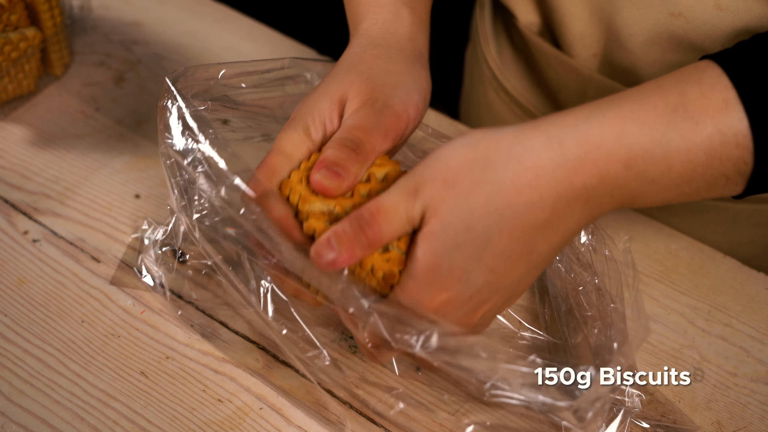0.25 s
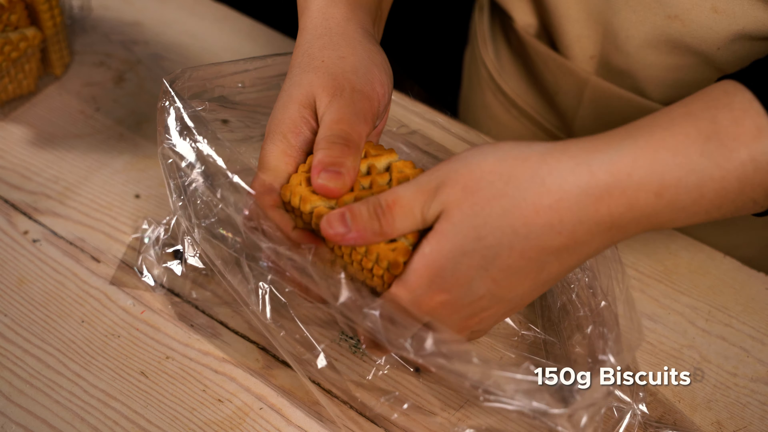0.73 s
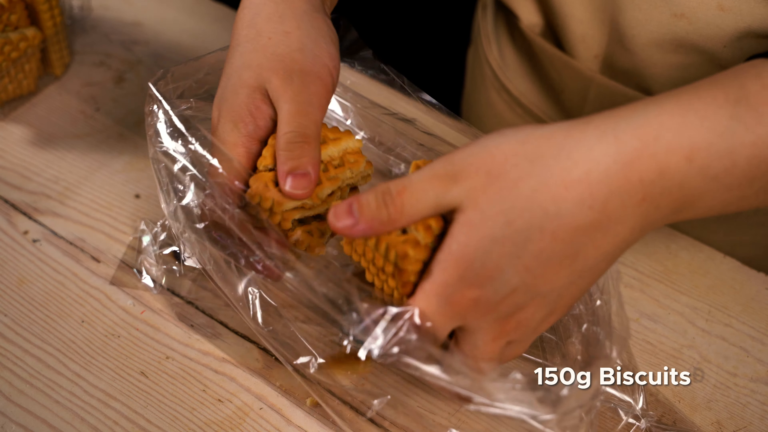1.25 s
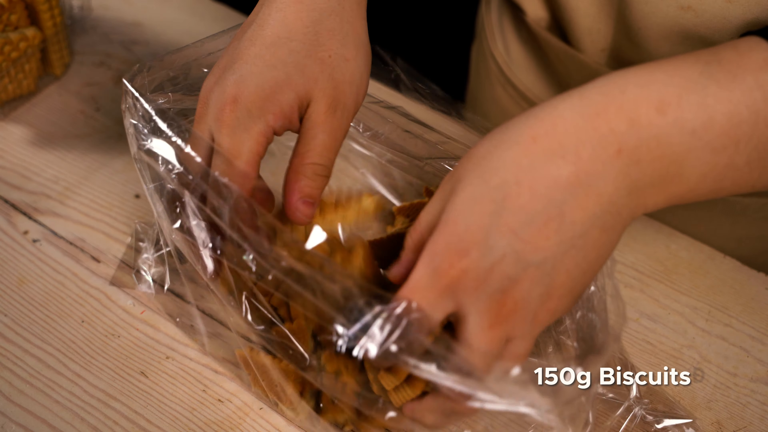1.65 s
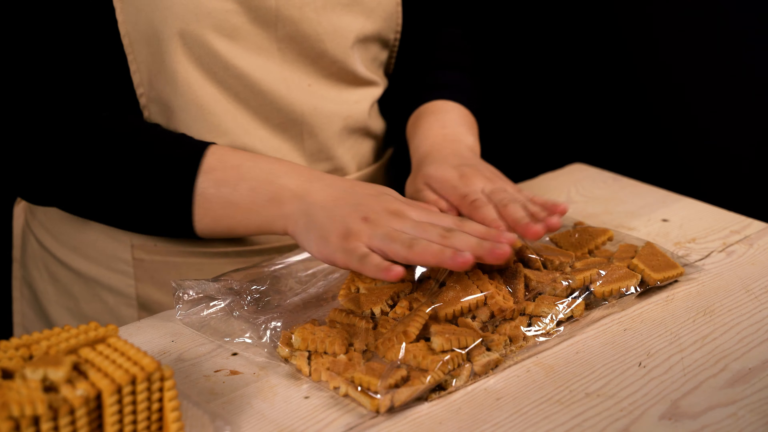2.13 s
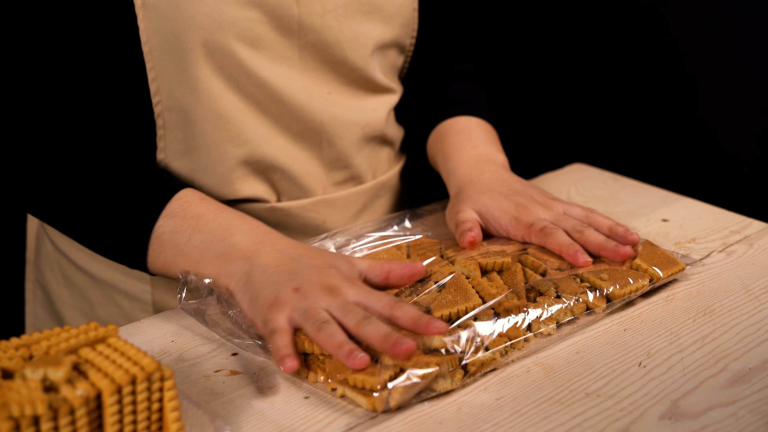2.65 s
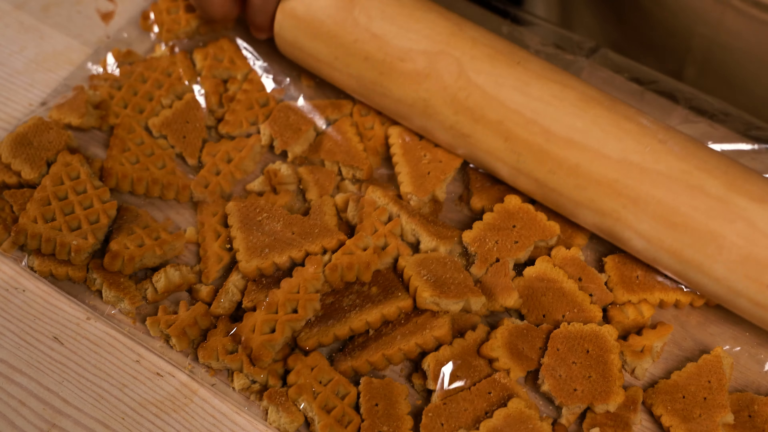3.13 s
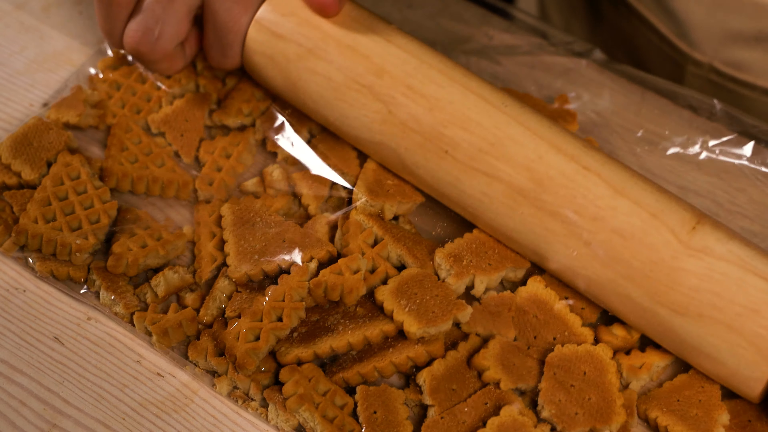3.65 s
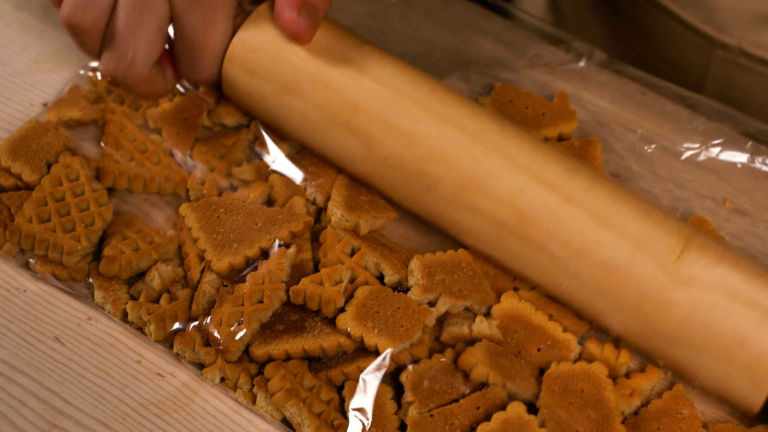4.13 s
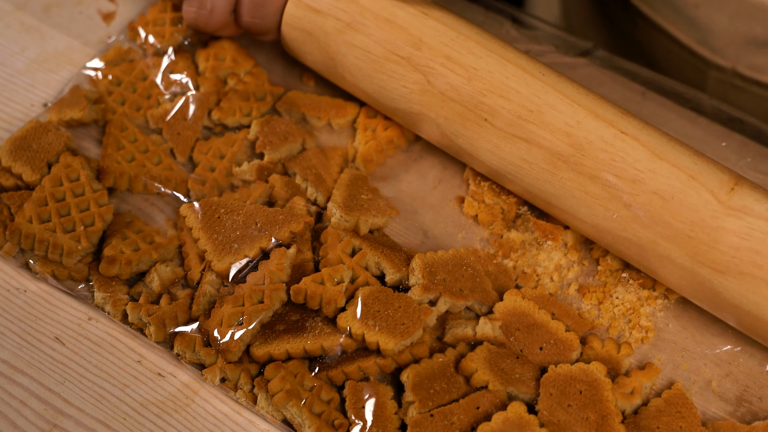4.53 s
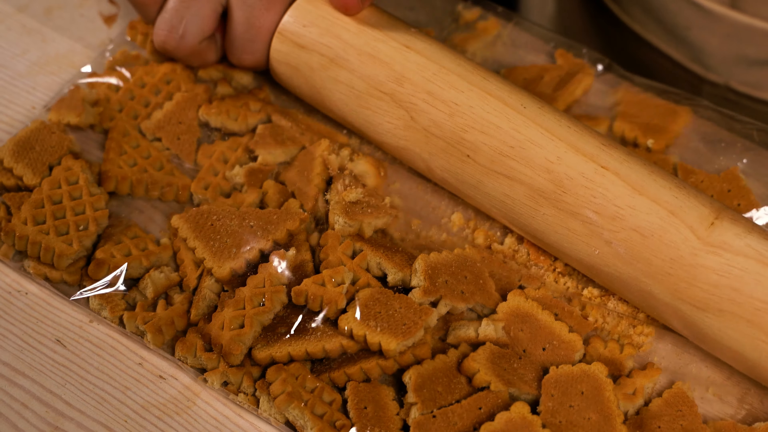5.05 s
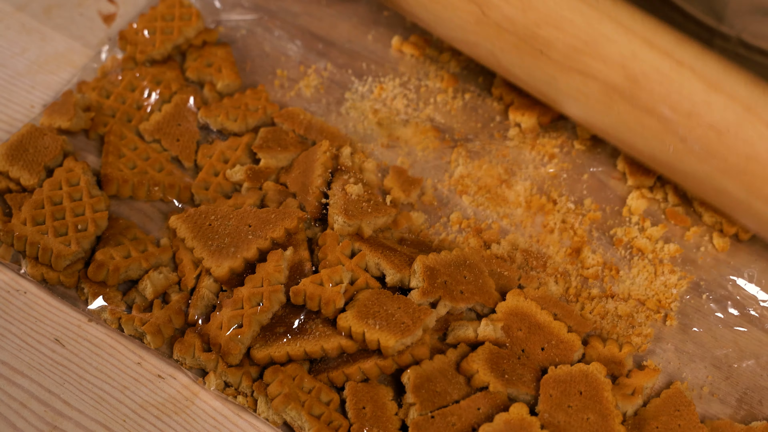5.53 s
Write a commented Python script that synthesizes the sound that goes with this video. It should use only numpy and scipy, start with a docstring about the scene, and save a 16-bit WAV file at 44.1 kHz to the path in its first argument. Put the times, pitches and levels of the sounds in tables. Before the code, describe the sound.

A close stereo microphone in a small, short-sounding kitchen, over a faint deep rumble and a dull low hum near the start. From 0 to 1.2 s fingers squeeze dry biscuits in thin plastic: fine bright crackle, crinkles and scattered sharp snaps, strongest around 0.4 s. At 1.3 and 1.5 s biscuits break with crisp crunches, and pieces tumble onto the wooden table in hollow knocks, densest at 1.6 to 1.75 s, thinning by 2.1 s. From 2.3 to 3.1 s palms spread them in three or four muffled, grating sweeps with small cracks. Then a rolling pin creeps quietly until a crunch at 3.65 s and a loud crunching thud at 3.9 s. Smaller knocks and crunches come at 4.5, 4.8 and 4.95 s, a heavy, long crunch at 5.07 s, crumbly crackling around 5.3 s, and a hard, bright wooden clack at 5.67 s, slightly overloaded.

```python
"""Crushing biscuits on a table

Dry biscuits are snapped by hand inside a plastic bag and tumble onto a wooden table; palms spread the pieces,
then a rolling pin bears down and breaks through them, knocking on the table top. Fracture is synthesized
as showers of tiny damped ticks and bursts of filtered noise, the table, pin and pieces as decaying modes.
A small kitchen answers, and a close stereo microphone overloads softly on the loudest crunches."""
import sys
import numpy as np
from scipy import signal
from scipy.fft import rfft, irfft, next_fast_len
from scipy.io import wavfile
from scipy.ndimage import uniform_filter1d

SR = 44100
rng = np.random.default_rng(int(sys.argv[2]) if len(sys.argv) > 2 else 0)


def digitize_waveform(pressure):
    """Quantize a signal to 16-bit integers and store it at the path in sys.argv[1].

    Rows of a 2-D input are taken as channels; values are limited to [-1, 1].
    """
    field = np.atleast_2d(pressure).T
    bounded = np.clip(field, -1, 1)
    quanta = np.round(bounded * 32767).astype(np.int16)
    wavfile.write(sys.argv[1], SR, quanta)


N = 255339  # samples


def amp(db):
    """Level to amplitude: 20 dB is a factor of ten."""
    return 10 ** (np.asarray(db) / 20)


def unit(x):
    """Normalization to an rms of 1."""
    return x / np.sqrt(np.mean(x ** 2) + 1e-20)


def along(points, hz):
    """Interpolation of (f/Hz, value) points on a logarithmic frequency axis."""
    f, value = np.transpose(points)
    return np.interp(np.log(hz + 1), np.log(f), value)


def add(track, s, sound):
    """Superposition: a sound is summed into a stereo track at time s."""
    part = track[:, max(round(s * SR), 0):][:, :sound.shape[-1]]
    part += sound[..., :part.shape[1]]


def coloured(x, spectrum, size=16384):
    """Minimum-phase filtering by a folded cepstrum: being causal, it keeps attacks sharp."""
    gain_db = along(spectrum, np.fft.rfftfreq(size, 1 / SR))
    cepstrum = irfft(np.log(amp(gain_db)))
    fold = 1 + np.sign(size // 2 - np.arange(size))
    fold[0] = 1
    impulse_response = irfft(np.exp(rfft(cepstrum * fold)))
    return signal.fftconvolve(x, impulse_response[None], axes=1)[:, :x.shape[1]]


def resonant(x, peaks):
    """Parallel second-order resonances with alternating sign, given as (f/Hz, width/Hz, level/dB)."""
    m = next_fast_len(N + SR // 2)
    f = np.fft.rfftfreq(m, 1 / SR)
    body = 0
    for k, (hz, width, db) in enumerate(peaks):
        damping = 1j * f * width
        body = body + (-1) ** k * amp(db) * damping / (hz * hz - f * f + damping)
    return irfft(rfft(x, m) * body, m)[:, :N]


def stereo_noise(length, side_db):
    """Mid-side white noise: side_db sets how far the two channels differ."""
    mid, side = rng.standard_normal((2, length))
    return unit(np.array([mid + amp(side_db) * side, mid - amp(side_db) * side]))


def grains(rate, top_hz, life, size_db, width, clump, count=4):
    """Clustered fracture at rms 1: damped ticks of random pitch, size and place.

    rate is in ticks per second, life (decay constant) and clump (mean delay) in s, count in ticks per cluster."""
    chains = int(rate * N / SR / count)

    def per_tick(values):
        return np.repeat(values, count)

    start = per_tick(rng.uniform(0, N, chains)) + SR * rng.exponential(clump, chains * count)
    cluster_db = size_db * np.minimum(per_tick(rng.exponential(1, chains)), 4)
    strength = amp(cluster_db) * rng.standard_normal(len(start))
    pitch, phase = rng.uniform(0, 1, (2, len(start), 1))
    pan = width * rng.standard_normal((len(start), 1))
    n = np.arange(int(5 * life * SR))
    decay = strength[:, None] * np.exp(-n / (life * SR))
    turn = 2 * np.pi * (top_hz * pitch * n / SR + phase)
    where = (start.astype(int)[:, None] + n).ravel()
    # an off-centre tick is shifted in phase between the capsules, more so the higher it is
    shift = pan * np.sqrt(pitch)
    pair = np.array([np.bincount(where, (decay * np.sin(turn + ear * shift)).ravel(), N)[:N]
                     for ear in (1, -1)])
    # steady pressure releases about the same energy in every short stretch
    power = np.abs(uniform_filter1d(np.mean(pair ** 2, 0), size=1500))
    return unit(pair / np.sqrt(power + 1e-6))


def struck(modes, corner_hz, width):
    """Modal synthesis of one blow on (f/Hz, level/dB, t60/s) modes; a soft contact weakens the high ones."""
    hz, db, t60 = np.transpose(modes)[:, :, None]
    t = np.arange(SR // 2) / SR
    varied_db = db + rng.normal(0, 2.1, hz.shape)
    strength = amp(varied_db) / np.hypot(1, hz / corner_hz)
    sign = (-1) ** np.arange(len(hz))[:, None]
    lead = width * rng.standard_normal(hz.shape)  # phase lead between the capsules
    envelope = sign * strength * amp(-60 * t / t60) * (1 - np.exp(-t * hz * 2))
    pair = np.array([np.sum(envelope * np.sin(2 * np.pi * hz * t + ear * lead), 0) for ear in (1, -1)])
    return pair / (2 * np.linalg.norm(strength))


def effort(pushes, extra_db=0):
    """Energy addition: gain of pushes that swell, hold and die away, linear in dB, their powers summed."""
    s, hold, db, rise, fall = np.transpose(pushes)[:5, :, None]
    t = np.arange(0, N, 16) / SR
    below = np.maximum(s - t, 0) / rise + np.maximum(t - s - hold, 0) / fall  # in steps of 20 dB
    each = amp(db + np.reshape(extra_db, (-1, 1)) - 20 * below)
    return np.interp(np.arange(N) / SR, t, np.linalg.norm(each, axis=0))


# spectrum of the low background: f/Hz, relative density level/dB
RUMBLE_SPECTRUM = [(5, -13.5), (12, -4.5), (25, -9.5), (45, -21.5), (100, -25), (300, -32.5), (2000, -50),
                   (15000, -58)]


def rumble():
    """Stationary random noise, shaped towards the lowest frequencies."""
    return amp(-35.5) * unit(coloured(stereo_noise(N, side_db=-1.0), RUMBLE_SPECTRUM))


# reverberation of the small kitchen: f/Hz, t60/s
KITCHEN_DECAY = [(100, 0.45), (1000, 0.29), (5000, 0.16), (15000, 0.11)]


def kitchen(x):
    """Diffuse reverberation from worktop and walls: convolution with noise whose decay depends on frequency."""
    hz, t, z = signal.stft(stereo_noise(SR // 3, side_db=-18.5), SR, nperseg=256)
    decay = amp(-60 * t / along(KITCHEN_DECAY, hz)[:, None])
    tail = signal.istft(z * decay, SR, nperseg=256)[1]
    return signal.fftconvolve(x, tail / np.linalg.norm(tail[0]), axes=1)[:, :N]


# dull, deep hums: t/s, f/Hz, level shared by both channels/dB, level opposed between them/dB,
# rise constant/s, t60/s
HUM_EVENTS = [(0.14, 66, -25, -7, .06, 1.16), (0.17, 130.6, -10.5, -14, .023, 0.24),
              (0.2, 92.4, -15, -16, .02, 0.46), (0.17, 213, -19.5, -11, 0.042, 0.54),
              (3.9, 86.6, -20, -17, 0.045, 1.04), (5.09, 56, -8, -3, .05, 0.7)]


def hums():
    """Damped free vibration in quadrature: slow hums swell and fade, reaching the capsules out of step."""
    out, t = np.zeros((2, N)), np.arange(SR) / SR
    for s, hz, mid_db, side_db, rise, t60 in HUM_EVENTS:
        turn = 2 * np.pi * hz * t
        opposed = np.outer((1, -1), amp(side_db) * np.cos(turn))
        pair = amp(mid_db) * np.sin(turn) + opposed
        add(out, s, amp(-60 * t / t60) * (1 - np.exp(-t / rise)) * pair)
    return out


# showers of broken pieces landing on the table: t/s, hold/s, relative level/dB,
# rise by 20 dB/s, fall by 20 dB/s
PIECE_SHOWERS = [(1.318, 0.012, -19.5, 0.011, 0.032), (1.52, .04, -40, .03, .1),
                 (1.602, .012, -6.5, 0.029, 0.15), (1.71, 0.086, -15, .1, 0.18),
                 (1.87, 0.21, -26, .1, 0.059)]


def table_load():
    """Power transmission: every action passes its own share into clatter, rattle and shake of the table."""
    # the table goes on trembling after a blow: rise and fall by 20 dB, in s
    hold_s, rise_s, fall_s = 0.0089, 0.0076, 0.15
    judder = effort([(s, hold_s, db, rise_s, fall_s) for s, db, *_ in TABLE_BLOWS])
    weight_db = [row[-1] for row in PIN_ROLLS]
    # each action with its relative shares (clatter dB, rattle dB, shake dB)
    actions = [(effort(FINGER_SQUEEZES), (-10, -14.5, -22)),
               (effort(PALM_SWEEPS), (-11.5, -14, -27.5)),
               (effort(PIN_ROLLS, weight_db), (-3, -4, -2)),
               (effort(PIECE_SHOWERS), (-1, 0, -9)),
               (judder, (-27.5, -19.5, -18.5))]
    return np.sqrt(sum(np.outer(amp(share_db), gain) ** 2 for gain, share_db in actions))


# spectrum of pieces clattering: f/Hz, relative density level/dB
CLATTER_SPECTRUM = [(200, -25.5), (400, -29), (520, -6), (660, 4.5), (800, 0), (1050, -3), (1400, -5.5),
                    (2200, -21), (3500, -58)]
# resonances of the table top under light taps: f/Hz, width/Hz, relative level/dB
RATTLE_RESONANCES = [(248, 65, -8), (281.8, 36, 0), (345.6, 34, -6), (379, 25, -2), (481, 25, -10),
                     (583, 32, -11.5)]
# spectrum of the low shake under the pin's weight: f/Hz, relative density level/dB
SHAKE_SPECTRUM = [(25, -15), (52, -4), (68, -6), (88, 4), (110, -6), (135, -8.5), (170, -9), (300, -11),
                  (800, -71)]


def table():
    """Forced vibration: pieces clatter and drum on the top; the pin's weight shakes it lower down."""
    clatter_gain, rattle_gain, shake_gain = table_load()
    knocks = grains(rate=700, top_hz=1953, life=0.0023, size_db=1.5, width=0.53, clump=.005)
    clatter = unit(coloured(knocks, CLATTER_SPECTRUM))
    taps = grains(rate=1800, top_hz=1950, life=0.00051, size_db=2.7, width=0.32, clump=0.004954)
    # light pieces hardly move the heavy top at its lowest frequencies
    light_taps = coloured(taps, [(130, -12), (240, -5), (420, -3.5), (650, -1.0)])
    rattle = unit(resonant(light_taps, RATTLE_RESONANCES))
    shake = unit(coloured(stereo_noise(N, side_db=-5), SHAKE_SPECTRUM))
    return amp(-4.5) * clatter_gain * clatter + amp(-2.0) * rattle_gain * rattle + amp(0.5) * shake_gain * shake


# blows on the table top: t/s, relative level/dB, corner f of the contact (lower is softer)/Hz,
# relative clack level of the pin/dB, relative bright ring level/dB
TABLE_BLOWS = [(2.766, -20.5, 150, -70, -70), (3.645, -6.5, 298, -21, -70), (3.890, -1, 500, -12, -70),
               (3.908, -9, 202, -37, -70), (4.481, -7, 456, 0, -70), (4.778, -20, 700, -45, -70),
               (4.805, -9, 700, -20, -70), (4.822, -23, 500, -26, -70), (4.951, -5.5, 600, -36, -70),
               (5.065, -2, 600, -11, -70), (5.1, -15, 200, -40, -70), (5.125, -5, 250, -27, -70),
               (5.673, 0.5, 500, 4.5, -3)]
# modes of the table top: f/Hz, relative level/dB, t60/s
TABLE_MODES = [(48, -19, 0.36), (84.4, 0.5, 0.079), (126, -6.5, 0.12), (192, -18, 0.2),
               (246.6, -14.5, 0.18), (286, 2.5, 0.071), (333, -9, 0.13), (382, -5.5, 0.077),
               (518, -34, 0.17), (614, -13, 0.078)]
# modes of the wooden pin: f/Hz, relative level/dB, t60/s
PIN_MODES = [(1200, -2.5, 0.03), (1317, -4, 0.029), (1650, 2, 0.021), (1814, 8, 0.014), (2960, -16, 0.025),
             (3700, -13, .014)]
# bright, rough ring in clusters of close modes: f/Hz, spread either way/Hz, relative level/dB, t60/s
RING_CLUSTERS = [(1780, 80, -6, 0.32), (2264, 210, 0.5, 0.3), (2766, 180, 2, 0.28), (3690, 484, 6, 0.099),
                 (4830, 310, -0.5, 0.21)]


def blows(count=26):
    """Impact excitation of modes: a thud from the top, a clack from the pin, a bright ring when hardest."""
    out = np.zeros((2, N))
    for s, db, corner_hz, clack_db, ring_db in TABLE_BLOWS:
        add(out, s, amp(db + 7.5) * struck(TABLE_MODES, corner_hz, width=0.063))
        add(out, s + 0.001965, amp(clack_db + 8.5) * struck(PIN_MODES, corner_hz=5000, width=0.15))
        if ring_db > -40:
            modes = [(hz + spread * u, level, t60)
                     for hz, spread, level, t60 in RING_CLUSTERS
                     for u in rng.uniform(-1, 1, count)]
            add(out, s + 0.0014, amp(ring_db + 7.5) * struck(modes, corner_hz=8000, width=0.35))
    return out


# larger pieces landing or knocking together: t/s, relative level/dB, f/Hz
PIECE_KNOCKS = [(0.34, -6, 670), (1.313, -7, 1860), (1.393, -1.5, 1710), (1.516, -11, 280),
                (1.593, 5.5, 283), (1.61, 6, 1170), (1.655, 0, 960), (1.621, 0, 356), (1.744, 4.5, 328),
                (1.851, -8, 335), (1.906, -8, 290), (1.948, -5.5, 279), (2, -10, 290), (2.328, -3, 1050),
                (2.518, -11, 1610), (2.91, -7, 2340), (3.074, -5.5, 1705), (4.823, -3, 1400),
                (4.953, -15, 690), (5.062, -4, 740), (5.365, -5.5, 1300)]


def pieces():
    """Free vibration of a small body: a short dry tock with one main mode and two weak higher ones."""
    out = np.zeros((2, N))
    for s, db, hz in PIECE_KNOCKS:
        t60 = 0.026 * (1000 / hz) ** 0.72  # higher pieces ring shorter
        modes = [(hz, 0, t60), (1.2 * hz, -7, t60 / 2), (2.75 * hz, -11, t60 / 2)]
        add(out, s + 0.00087, amp(db + 3) * struck(modes, corner_hz=6000, width=0.12))
    return out


# a whole biscuit giving way in a cascade of fractures: t/s, level/dB, t60/s
BISCUIT_BREAKS = [(1.314, -8, 0.14), (1.498, -5, 0.047), (2.316, -20, 0.65), (3.641, -19, .11),
                  (3.89, -6, 0.21), (4.484, -11.5, 0.057), (4.824, -16, 0.068), (5.067, -3, 0.26),
                  (5.674, -3, 0.035)]
# spectrum of the cascades: f/Hz, relative density level/dB
FRACTURE_SPECTRUM = [(100, -16), (300, -6.5), (600, -2.5), (1200, -0.5), (1800, -3), (3000, -6), (5000, -9),
                     (8000, -7), (12000, -9), (16000, -33)]


def breaks():
    """Crack propagation: a dense burst of fractures dies away exponentially."""
    force, t = np.zeros((2, N)), np.arange(SR // 3) / SR
    for s, db, t60 in BISCUIT_BREAKS:
        add(force, s, amp(db - 60 * t / t60) * (1 - np.exp(-t / 0.00047)))
    fractures = grains(rate=12000, top_hz=16600, life=0.00011, size_db=0, width=0.52, clump=0.0012)
    return force * unit(coloured(fractures, FRACTURE_SPECTRUM))


# single cracks of biscuit and creases of film: t/s, relative level/dB,
# low-mid body level relative to the crack/dB
CRACKS = [(0.046, -11, -27), (0.077, -9, -10), (0.0977, -8, -28), (0.1482, -10.5, -6), (0.182, -7.5, -23),
          (0.2645, -4, -25), (0.2961, -2.5, -17), (0.3404, -1, -9), (0.3616, 2, -28), (0.452, 1, -17),
          (0.4895, -4, -28), (0.5688, -10, -13), (0.603, -6.5, -5.5), (0.613, -10, -24), (0.7358, -10, -25),
          (0.7709, -14.5, -16), (0.826, -13, -17), (0.877, -12, -4), (0.8948, -13, -8), (0.9661, -3.5, -23),
          (1.114, -9, -5.5), (1.2266, -1, -23), (1.304, -7, -13), (1.3796, -7, -10), (1.3946, -3.5, -3.5),
          (1.4494, -3.5, -18), (1.948, -3.5, -13), (2.0306, -6.5, -29), (2.0548, -5.5, -25),
          (2.0852, -6.5, -26), (2.152, -13, -25), (2.4703, -8.5, -0.5), (2.6645, -6, -8), (2.7408, -3, -13),
          (2.7702, -5, -2.5), (2.9494, -12, -20), (3.1305, -12, -20), (4.039, -11, -17)]


def snaps():
    """Sudden release of strain: a sharp tick with a brief shiver of film and a lower pop from the piece."""
    out, t = np.zeros((2, N)), np.arange(SR // 25) / SR
    # small stray snaps while hands work the bag
    creases_per_s, crease_db, crease_spread_db, crease_body_db = 11, -15, 5, -18
    handling_s = FINGER_SQUEEZES[-1][0] + FINGER_SQUEEZES[-1][1]
    creases = [(handling_s * u, crease_db + crease_spread_db * (2 * v - 1), crease_body_db)
               for u, v in rng.uniform(0, 1, (int(creases_per_s * handling_s), 2))]
    for s, db, body_db in CRACKS + creases:
        tick_decay = np.exp(-t / .0018) + .15 * np.exp(-t / .006)
        tick = coloured(stereo_noise(len(t), side_db=-8) * tick_decay, CRACKLE_SPECTRUM)
        pop = coloured(stereo_noise(len(t), side_db=-45) * np.exp(-t / 0.005), CRUNCH_SPECTRUM)
        add(out, s + .0008, amp(db - 20) * unit(tick) + amp(db + body_db - 17.5) * unit(pop))
    return out


# fingers squeezing the biscuits in the bag: t/s, hold/s, relative level/dB,
# rise by 20 dB/s, fall by 20 dB/s, crunch against crackle/dB
FINGER_SQUEEZES = [(0.01, .12, -31, 0.048, 0.047, -0.5), (0.184, .15, -27, 0.023, .1, -6.5),
                   (0.379, 0.028, -15.5, 0.057, 0.23, -5.5), (0.586, 0.38, -37, .1, 0.11, 1.5),
                   (0.668, 0.0055, -28.5, 0.02, 0.061, -3), (0.937, 0.027, -25, 0.12, 0.087, 1),
                   (1.067, .005, -27, 0.056, 0.043, -1), (1.185, 0.043, -16.5, .11, 0.14, -8.5),
                   (1.331, 0.0094, -11.5, 0.033, 0.059, -1), (1.396, 0.016, -19.5, .002, 0.19, 0.5),
                   (1.532, 0.095, -10, 0.065, 0.11, -2), (1.734, 0.023, -5, 0.14, 0.095, -4),
                   (1.867, 0.24, -25.5, .1, 0.13, -6.5)]
# palms sweeping the pieces flat: t/s, hold/s, relative level/dB, rise by 20 dB/s, fall by 20 dB/s
PALM_SWEEPS = [(2.32, 0.03, -21, 0.034, 0.15), (2.48, 0.05, -15.5, 0.14, 0.17),
               (2.67, 0.036, -15.5, 0.19, 0.27), (2.88, 0.0093, -20, 0.056, 0.054),
               (2.94, .19, -25.5, 0.088, 0.061)]
# the pin rolling on: t/s, hold/s, relative level/dB, rise by 20 dB/s, fall by 20 dB/s,
# crunch against crackle/dB, weight on the table/dB
PIN_ROLLS = [(3.24, .02, -32.5, 0.27, 0.29, -1, -10.5), (3.485, 0.14, -33.5, 0.29, 0.12, 0, -7),
             (3.644, .004, -14, .012, 0.084, -3, -15), (3.763, 0.062, -29.5, 0.12, .1, -1.5, -3.5),
             (3.902, 0.018, -14, 0.077, 0.033, -1, 1), (4.037, 0.023, -30.5, 0.25, 0.079, -5, -16.5),
             (4.159, 0.092, -27.5, 0.076, 0.14, -1.5, -17), (4.496, 0.011, -24.5, 0.068, 0.15, -1.5, -22),
             (4.65, .11, -38, .1, .1, -2, -7), (4.827, 0.0055, -19.5, 0.053, 0.081, -0.5, -1),
             (4.951, .003, -27.5, .015, 0.045, -1.5, -6), (5.005, 0.045, -31.5, .02, .05, -3, 2),
             (5.068, 0.028, -13.5, .025, 0.18, -2.5, 4.5), (5.273, 0.033, -19, 0.12, .15, -4, -6),
             (5.391, 0.016, -20, 0.13, 0.075, -8, -25), (5.56, 0.035, -38.5, 0.24, 0.041, -7.5, -13),
             (5.664, 0.016, -24.5, 0.042, 0.11, -3.5, -18)]
# spectrum of film and crumbs: f/Hz, relative density level/dB
CRACKLE_SPECTRUM = [(300, -15), (1000, -8.5), (2500, -3.5), (3800, -2), (5200, -2), (7500, -0.5),
                    (10000, -3), (12200, -1.5), (14000, -7), (16000, -8.5)]
# spectrum of larger pieces: f/Hz, relative density level/dB
CRUNCH_SPECTRUM = [(200, -6.5), (500, -4), (800, -1.5), (1100, 1.5), (1400, 1.5), (1750, 2.5), (2200, 0.5),
                   (3000, -0.5), (4500, -6), (8000, -38.5)]
# spectrum of pieces rubbing together, muffled under the palms: f/Hz, relative density level/dB
RUBBING_SPECTRUM = [(250, -13.5), (650, -9), (1000, -0.5), (1300, -1.5), (1750, 1), (2300, -2), (2900, -3),
                    (3800, -13.5), (8000, -40)]


def crumbling():
    """Brittle fracture by size: film and crumbs crackle finely; larger pieces crunch or rub, lower and longer."""
    fine = grains(rate=13000, top_hz=16400, life=0.0001, size_db=1.5, width=0.48, clump=.0015, count=8)
    coarse = grains(rate=4000, top_hz=4800, life=0.00069, size_db=-2.0, width=0.033, clump=.002)
    pressed = grains(rate=3000, top_hz=4180, life=0.0012, size_db=2.0, width=0.028, clump=.004)
    crackle = unit(coloured(fine, CRACKLE_SPECTRUM))
    crunch = unit(coloured(coarse, CRUNCH_SPECTRUM))
    rubbing = unit(coloured(pressed, RUBBING_SPECTRUM))
    crushing = [row[:6] for row in FINGER_SQUEEZES + PIN_ROLLS]
    crunch_db = [row[-1] for row in crushing]
    palms = effort(PALM_SWEEPS)
    return (amp(1.0) * np.hypot(effort(crushing), palms) * crackle
            + amp(-1.37) * effort(crushing, crunch_db) * crunch
            + amp(-1.3) * palms * rubbing)


def scene():
    """Linear superposition of the rumble, the hums, the room's answer and the work on the table."""
    near = crumbling() + snaps() + pieces() + breaks() + table() + blows()
    return rumble() + amp(-11.5) * kitchen(near) + hums() + near


def record(dry):
    """Soft saturation near full scale, then band limitation."""
    ceiling, knee, top_hz = .88, 5, 15850
    clipped = dry / (1 + np.abs(dry / ceiling) ** knee) ** (1 / knee)
    m = next_fast_len(N + SR // 2)
    passed = np.fft.rfftfreq(m, 1 / SR) < top_hz
    return irfft(rfft(clipped, m) * passed, m)[:, :N]


dry = scene()
out = record(dry)
digitize_waveform(out)
```